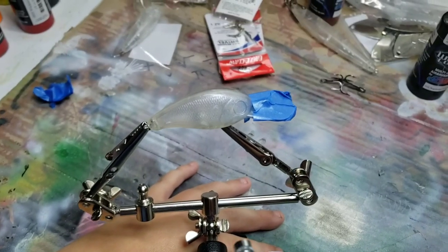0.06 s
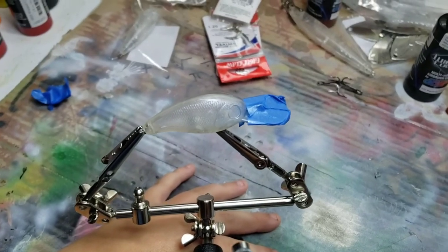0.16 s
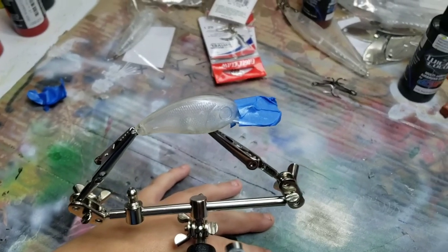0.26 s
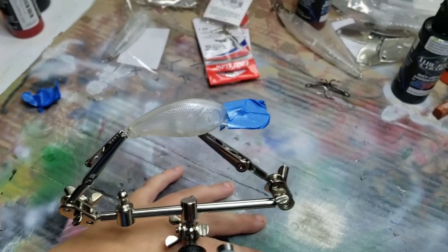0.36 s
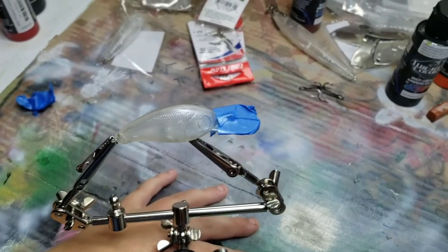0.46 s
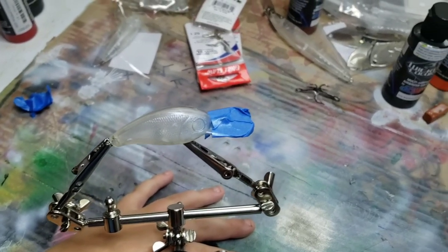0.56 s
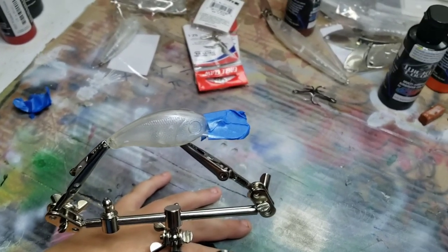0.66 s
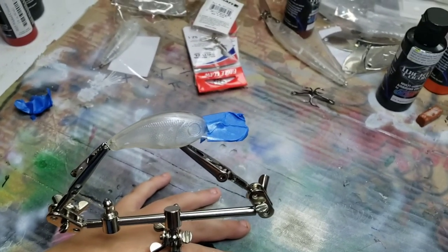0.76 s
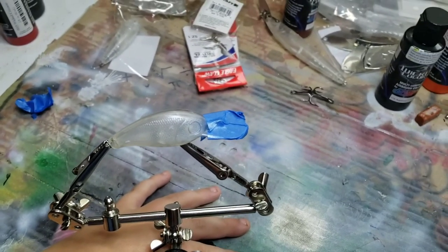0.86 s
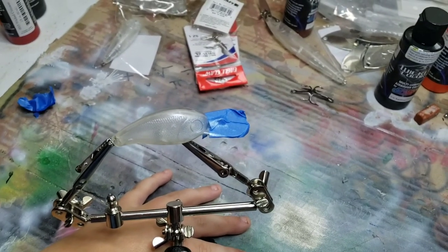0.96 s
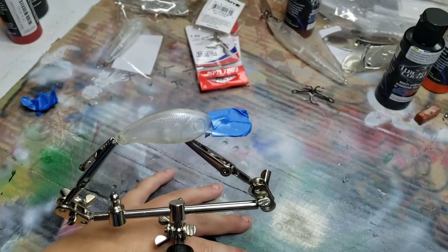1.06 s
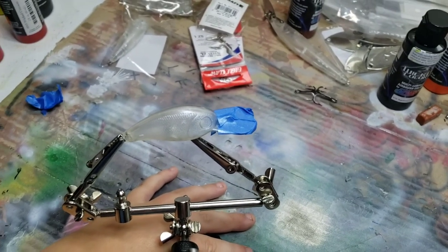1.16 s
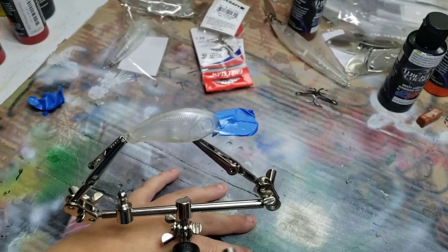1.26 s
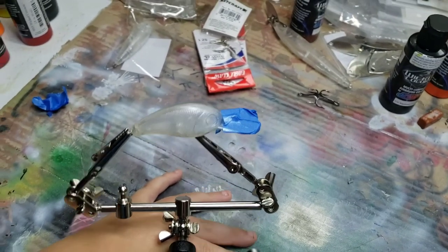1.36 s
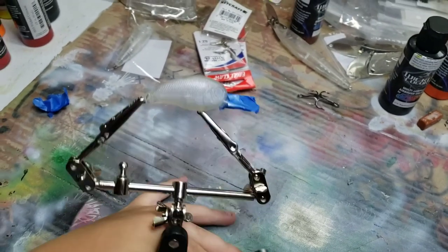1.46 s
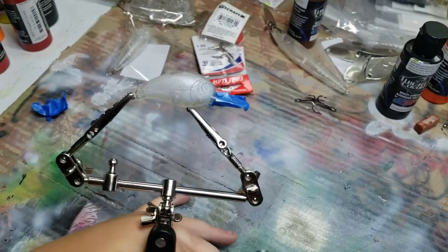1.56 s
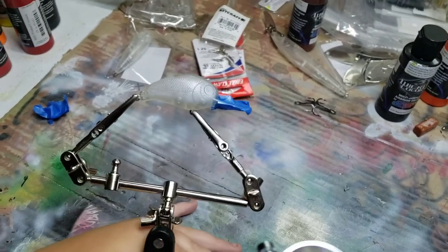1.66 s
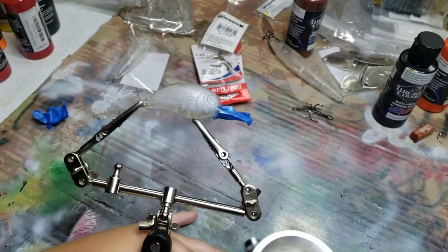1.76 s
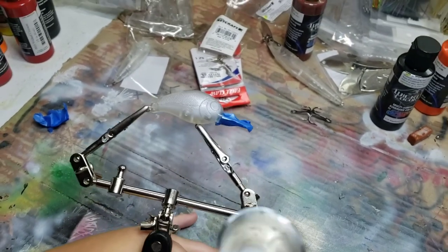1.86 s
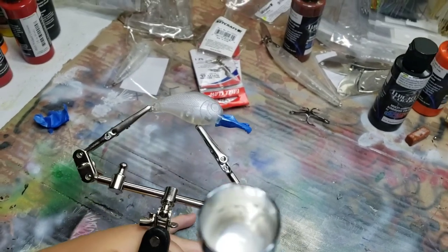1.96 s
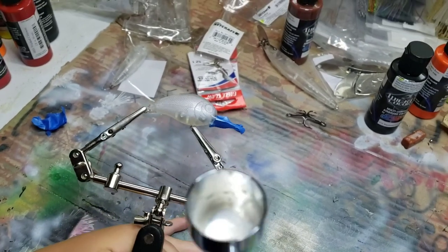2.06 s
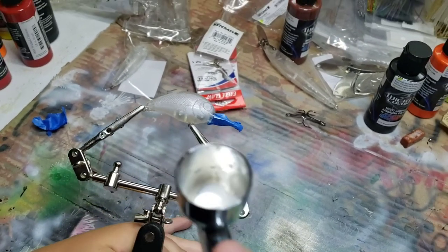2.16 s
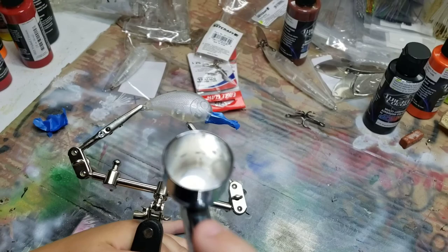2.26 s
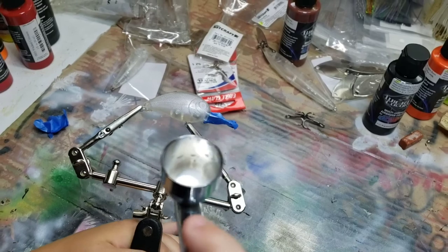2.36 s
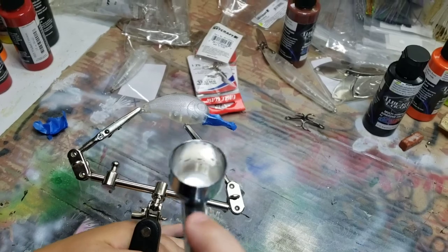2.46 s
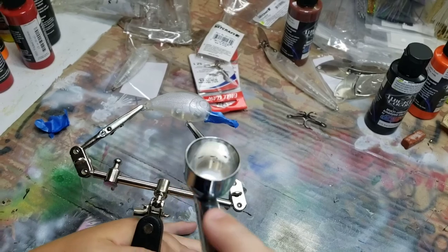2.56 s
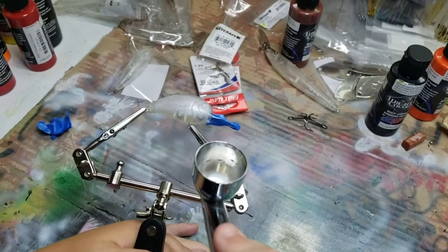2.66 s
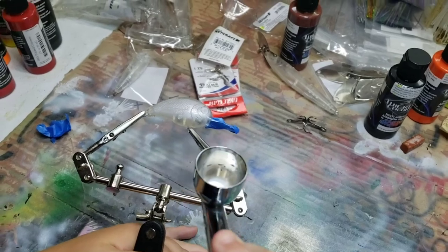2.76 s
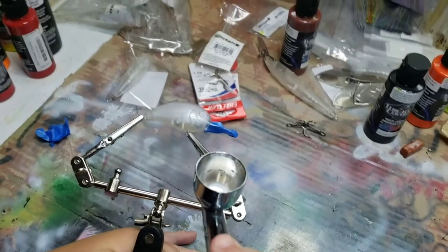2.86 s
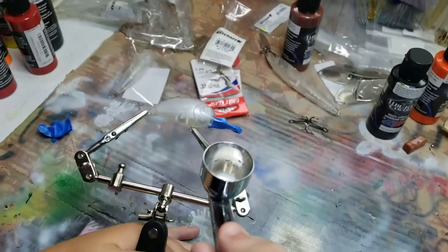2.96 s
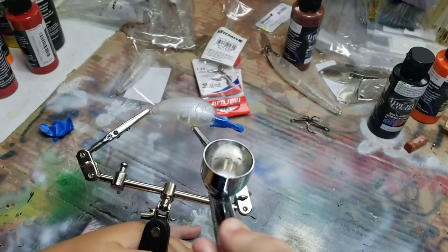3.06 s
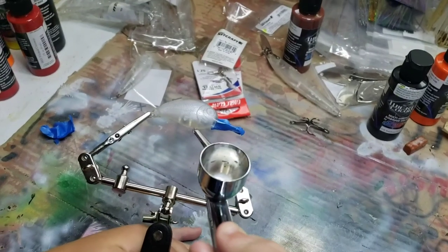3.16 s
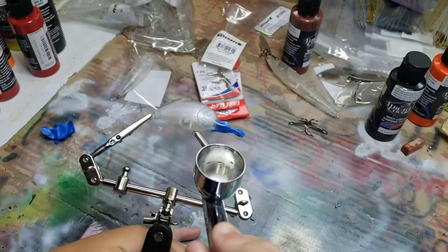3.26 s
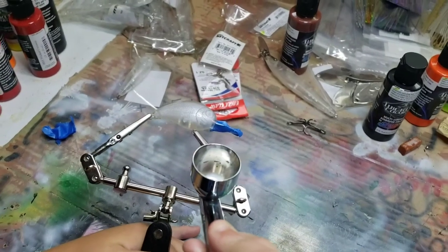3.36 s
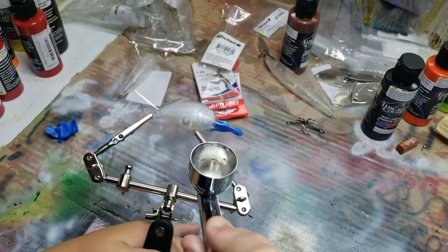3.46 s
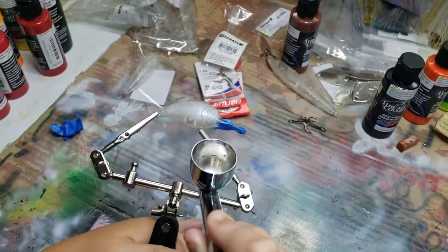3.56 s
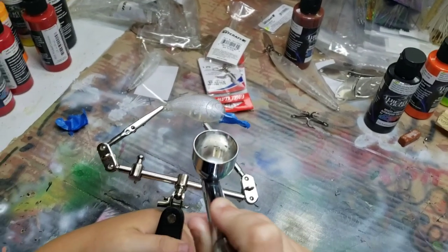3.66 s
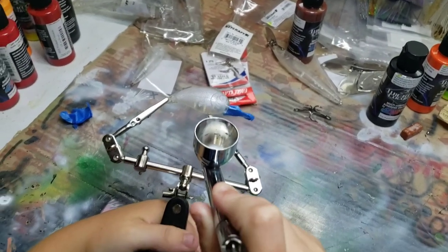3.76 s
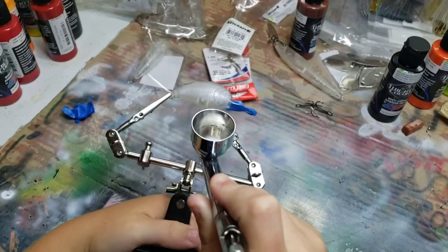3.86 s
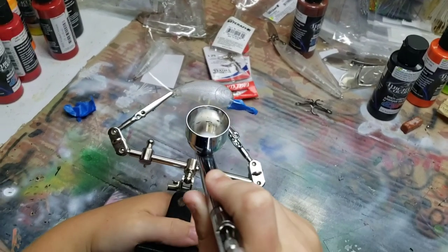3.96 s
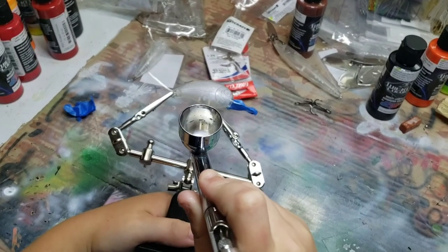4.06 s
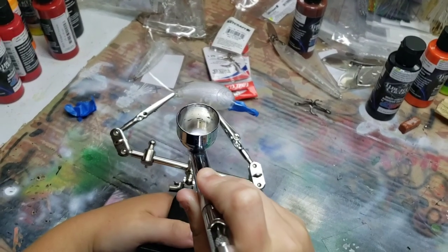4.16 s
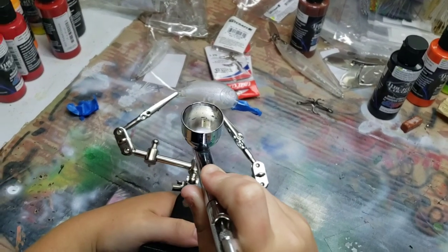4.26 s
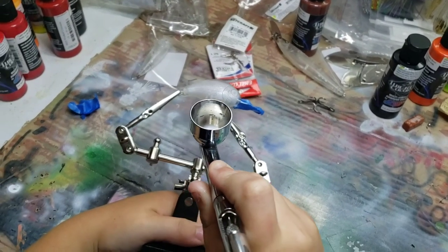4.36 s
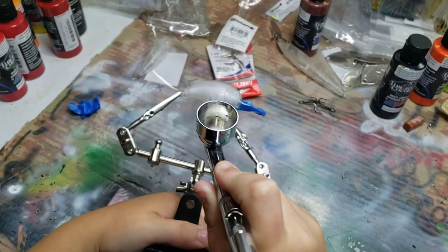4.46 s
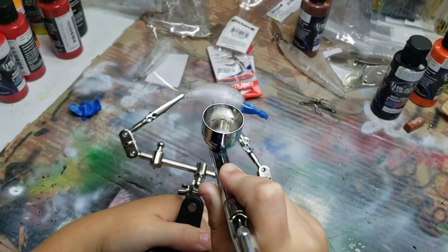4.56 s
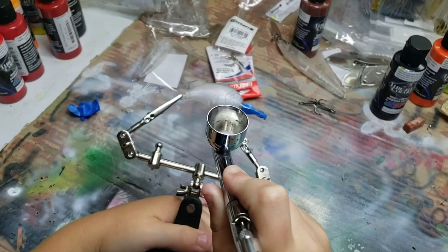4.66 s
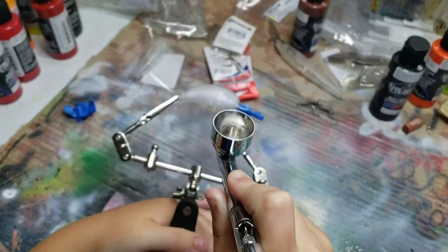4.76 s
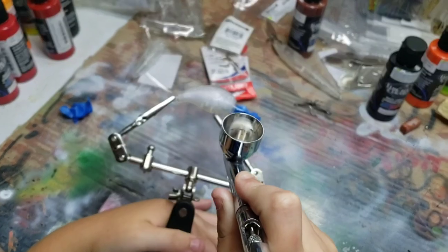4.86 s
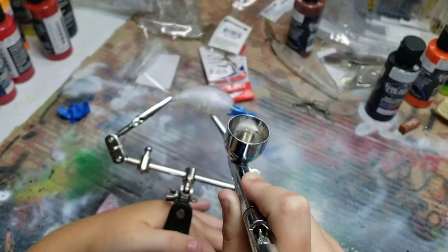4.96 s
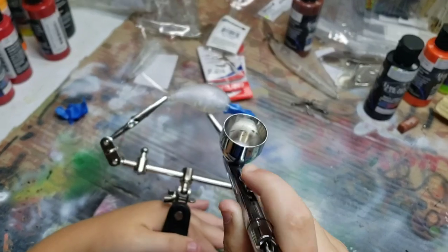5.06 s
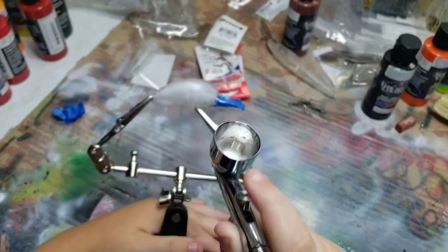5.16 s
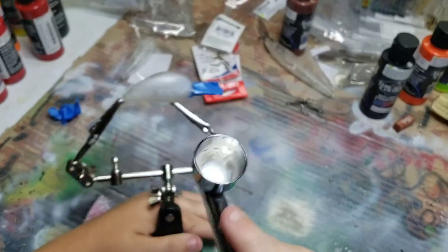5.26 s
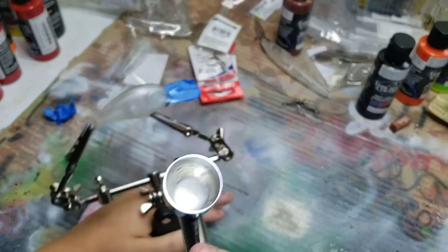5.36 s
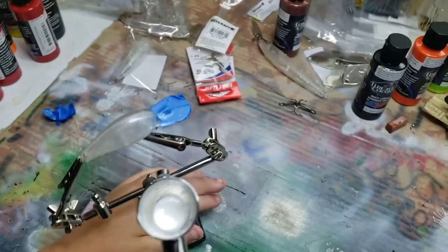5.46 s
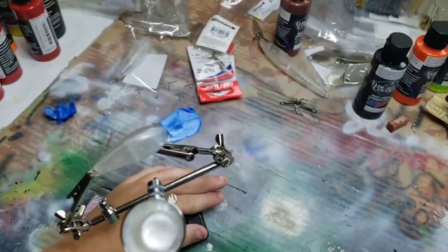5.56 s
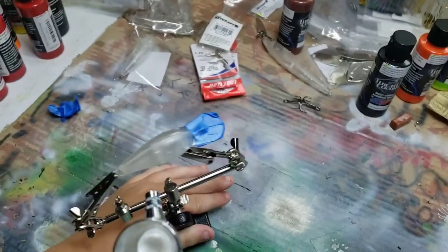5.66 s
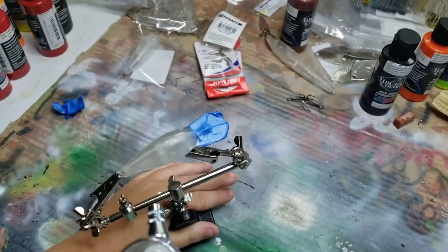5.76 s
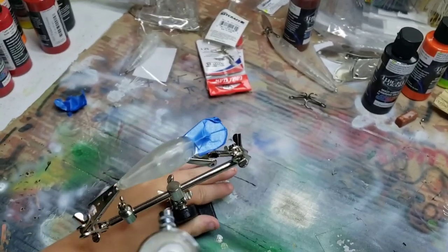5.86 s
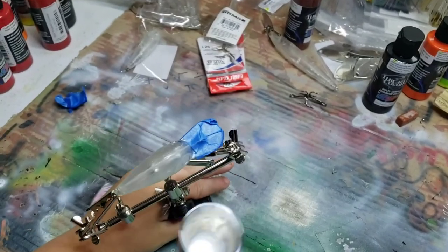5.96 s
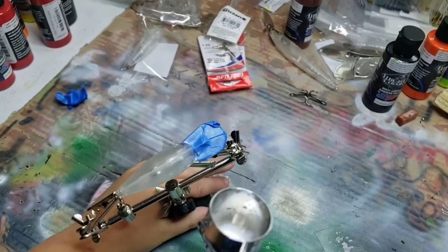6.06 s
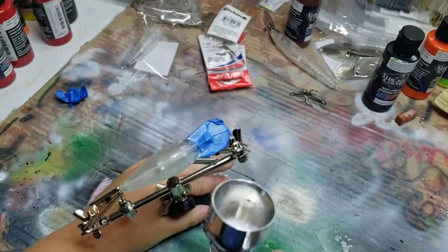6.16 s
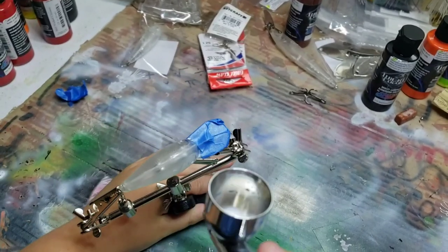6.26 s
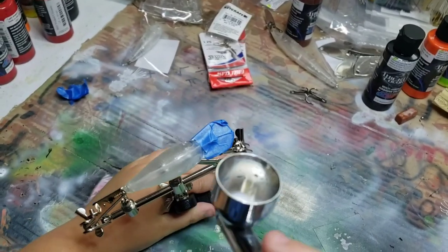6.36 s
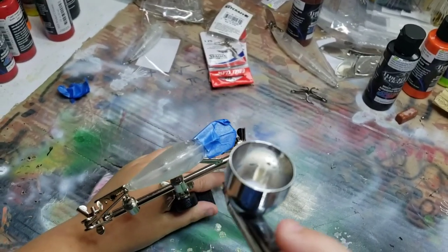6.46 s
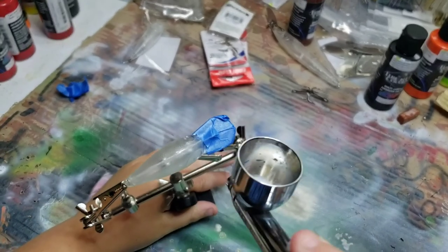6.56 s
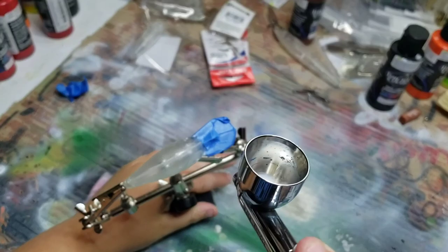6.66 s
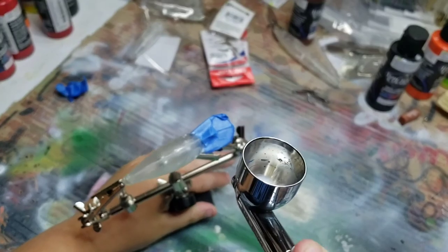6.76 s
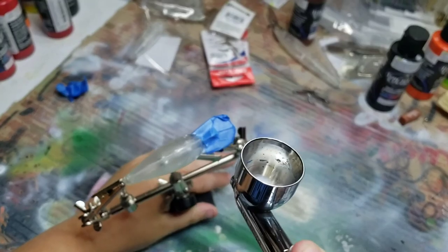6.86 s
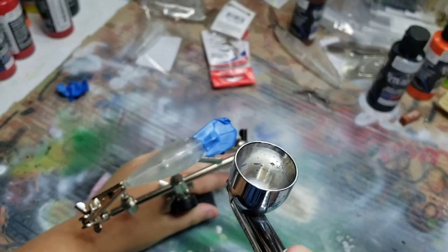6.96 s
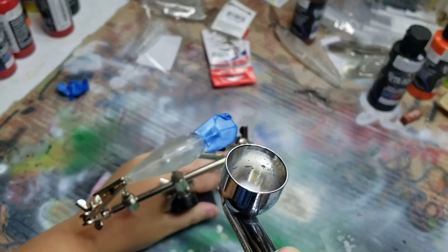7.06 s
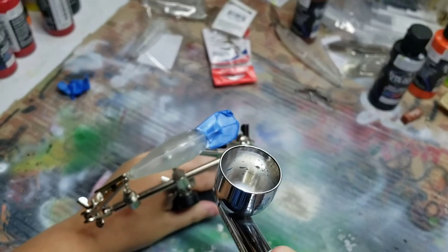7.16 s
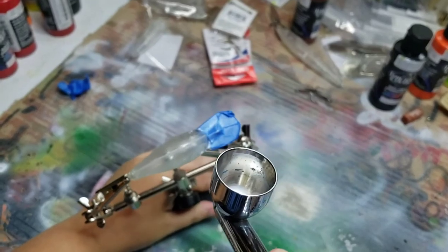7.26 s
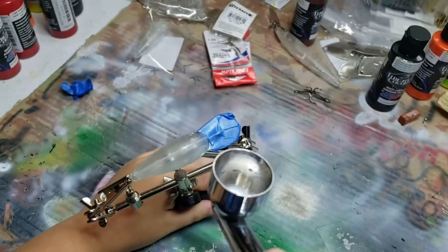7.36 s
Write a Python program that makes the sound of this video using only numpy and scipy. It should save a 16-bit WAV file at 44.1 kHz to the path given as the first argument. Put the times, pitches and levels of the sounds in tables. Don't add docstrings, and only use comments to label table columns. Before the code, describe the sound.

Close stereo sound of an airbrush in three bursts: bright, sizzling air with a softer roar where it strikes the work. Beneath it a small piston compressor chatters about twenty-eight knocks a second, wheezing. Each pause brings a crisp trigger snap, a sharp pressure-switch crack, slowing knocks, then faint ticks and sleeve rustle in a quiet room before the hiss resumes and the pump later joins.

```python
import sys
import numpy as np
from scipy import signal
from scipy.fft import rfft, irfft, next_fast_len
from scipy.io import wavfile
from scipy.ndimage import uniform_filter1d

SR = 44100
rng = np.random.default_rng(int(sys.argv[2]) if len(sys.argv) > 2 else 0)


def to_wav(s):
    ch = np.atleast_2d(s).T
    pcm = np.round(np.clip(ch, -1, 1) * 32767)
    wavfile.write(sys.argv[1], SR, pcm.astype(np.int16))


def amplitude_ratio(level_db):
    exponent = np.asarray(level_db, float) / 20
    return 10 ** exponent


N = 326340

# (opens [s], shuts [s])
TRIGGER = [
    (-1, 1.313),
    (2.406, 5.09),
    (6.424, 9),
]
# (time [s], air flow [dB], how squarely the jet beats on the work [dB])
BURSTS = [
    [(0, -34, -50), (.5, -34, -48), (.72, -32.5, -43), (.9, -34, -49), (1.25, -34, -50), (1.31, -36, -50)],
    [(2.42, -38, -62), (2.49, -41, -59), (2.68, -41, -56), (2.97, -35, -56), (4.0, -35, -52),
     (4.5, -34, -50), (5.08, -33, -50)],
    [(6.44, -37, -45), (6.57, -39, -47), (6.96, -33, -46), (7.17, -34, -43), (7.4, -34, -44)],
]
# (frequency [Hz], density [dB per Hz])
FIZZ = [(6500, -40), (10000, -11), (11400, -7), (12300, -1), (13300, -3.5), (14200, 0), (15100, 1),
        (15700, 3)]
# (frequency [Hz], density [dB per Hz])
HISS = [(1700, -40), (2700, -17), (3400, -15), (4160, -6), (4540, -5), (5360, -1.5), (7470, -3.5),
        (8070, -1), (8730, -5), (9300, -3), (12000, -32), (20000, -120)]
# (frequency [Hz], density [dB per Hz])
ROAR = [(88, -35), (150, -6), (226, -9), (401, -2), (717, -3), (944, -1), (1410, -10), (2030, -8),
        (2600, -12), (3600, -13), (5000, -40), (9000, -120)]
# (frequency [Hz], density [dB per Hz])
SPLASH = [(1200, -40), (2000, -4), (3000, 0), (4200, 0), (6500, -30), (12000, -120)]
HISS_DB = [-8.5, -8.5, -7]
SPLASH_DB = [-34, -32, -14.5]
# (frequency [Hz], left-right [dB])
JET_SIDE = [(60, 0.0), (99, 0.5), (160, 0.5), (270, 1.0), (450, 1.5), (740, 4.0), (1220, 1.0), (2010, 3.0),
            (3330, -5.5), (5500, -10.0), (9080, -8.0), (15000, -5.0)]
# (frequency [Hz], common share [0-1])
JET_ALIKE = [(100, .95), (640, .88), (1400, .6), (3000, .58), (8000, .58), (15000, .5)]
FIZZ_DB, ROAR_DB = 6.6, 0
OPEN_S, SHUT_S, BLEED_DB, BLEED_T60_S = .011, .012, -14, .5

# (first stroke at full speed [s], last stroke at full speed [s])
RUNS = [
    (-.07, 1.6805),
    (3.012, 5.5325),
    (7.031, 7.416),
]
# (time from full speed [s], level [dB])
SPIN_UP = [(-.14, -50), (-.075, -15), (-.02, -12), (0.0, -2), (.1, 0)]
# (time from cut-out [s], level [dB])
COAST = [(.009, 0), (.045, -7), (.1, -20), (.2, -30), (.34, -50)]
# (frequency [Hz], t60 [s], struck at share of turn [0-1], level in run 1, 2, 3 [dB])
CASING = [(76, .06, .22, -36, -37, -36.5), (119, .06, .36, -34, -34.5, -34.5),
          (170, .1, .46, -39.5, -39.5, -40), (245, .06, .4, -51, -51, -49), (463, .1, .05, -39, -40, -42),
          (505, .06, .4, -44.5, -44.5, -45), (598, .11, .15, -46, -42, -44), (700, .05, .6, -41, -46, -45),
          (795, .07, .1, -40, -45, -43), (880, .05, .0, -41, -49, -46), (962, .115, .5, -38, -36, -35.5),
          (1490, .04, .0, -50, -54, -50), (1580, .065, .0, -46, -35, -34),
          (1625, .085, .02, -36.5, -50, -48), (1765, .06, .0, -47, -47, -47),
          (2000, .03, .02, -39, -44, -43), (2200, .025, .06, -41, -46, -45),
          (5800, .025, .72, -49, -48, -48)]
# (frequency [Hz], density [dB per Hz])
WHEEZE = [(1410, -29), (2400, 1), (2480, -7), (3580, -12), (5880, -5), (7270, -10), (8510, -5), (9950, -12),
          (11000, -3), (15700, 0)]
# (frequency [Hz], density [dB per Hz])
RATTLE = [(24, -38), (45, -13), (162, -11), (401, -18), (453, -2), (677, -8), (978, -1), (1120, -20),
          (1340, -24), (1590, -4), (2600, -32), (3380, -62), (5720, -120)]
# (frequency [Hz], left-right [dB])
PUMP_SIDE = [(60, -0.5), (110, 0.0), (200, 1.0), (380, 2.5), (700, 3.0), (1290, 0.5), (2380, 2.5),
             (4400, -8.0), (8120, -12.0), (15000, -8.0)]
TURN_S = .035
SPIN_UP_DRAG, COAST_DRAG = 1.18, 1.36

# (frequency [Hz], density [dB per Hz])
HUM = [(20, -40), (35, -8), (55, 1), (80, 1), (100, -6), (145, -1), (200, -5), (310, -11), (500, -15),
       (1000, -20), (1600, -17), (2300, -23), (3200, -33), (5000, -100)]
# (frequency [Hz], density [dB per Hz])
SHUFFLE = [(1200, -40), (2200, -6), (3400, -10), (5000, -4), (7300, -10), (9500, -14), (15700, -7)]
# (frequency [Hz], common share [0-1])
HUM_ALIKE = [(60, .93), (180, .93), (550, .65), (1650, .2), (15000, .1)]
# (time [s], lift [dB], width [s])
STIRS = [(1.98, 6, .05), (2.2, 5, .08), (2.39, 11, .06), (6.15, 4, .02), (5.95, 5, .07), (6.24, 3, .06)]
HUM_DB, HUM_SURGE_DB, HUM_SINK_DB_PER_S, HUM_REST_DB = -56, -54, 20, -62
SHUFFLE_DB, SHUFFLE_SURGE_DB, SHUFFLE_SINK_DB_PER_S, SHUFFLE_REST_DB = -71, -62, 40, -82
SURGE_S, BACK_S = .05, .3

# (time [s], peak [dB], ring [Hz], left-right [dB])
RELEASES = [(1.3528, -20, 12400, -8.0), (5.1402, -17.5, 14900, -8.5)]
# (time [s], peak [dB], ring [Hz], left-right [dB])
CLICKS = [(1.5569, -35, 3610, -8.5), (1.7779, -34, 4050, -8.5), (1.9205, -43, 5620, -9.5),
          (2.0058, -36, 2870, -7.5), (5.6306, -36, 4110, -9.5)]
# (time [s], peak [dB], ring [Hz], left-right [dB])
TICKS = [(1.8617, -52, 5810, -8.5), (5.7164, -49, 5790, -12.0), (5.909, -60, 13000, -12.0),
         (6.1529, -52, 5050, -11.0), (6.155, -58, 7000, -11.0)]
# (time [s], peak [dB], ring [Hz], left-right [dB])
SWITCH = [(1.6846, -18, 8200, -14), (5.5368, -15.5, 8300, -15)]
# (time [s], peak [dB], ring [Hz], left-right [dB])
SWITCH_CRACK = [(1.685, -30, 5500, -8), (5.537, -30, 5500, -8), (2.868, -34, 2000, 0), (2.868, -38, 700, 1)]
# (time [s], peak [dB], ring [Hz], left-right [dB])
SWITCH_RING = [(1.686, -37, 8200, -12), (5.538, -35, 8300, -12)]
# (time [s], peak [dB], ring [Hz], left-right [dB])
KNOCKS = [(1.777, -39, 420, 1.5), (1.778, -41, 1100, 2), (1.823, -47, 800, 3.5), (1.931, -43, 850, 3.5),
          (2.119, -57, 1130, 2.5), (5.63, -38, 466, 2.0), (5.631, -40, 1100, 2), (5.803, -47, 900, 3.5),
          (6.031, -54, 264, 3.5), (6.69, -44, 170, 1)]
# (time [s], peak [dB], ring [Hz], left-right [dB])
PUFF = [(2.0961, -38, 5200, -6.5)]
# (time [s], peak [dB], ring [Hz], left-right [dB])
PUFF_RING = [(2.097, -49, 3700, -6.5), (2.097, -45, 5700, -6.5), (2.097, -48, 7100, -6.5)]
# (time [s], peak [dB], ring [Hz], left-right [dB])
BUMP = [(2.335, -51, 380, 2), (6.23, -54, 150, 1), (5.54, -42, 60, -2)]
# (events, t60 [s], ringing share [0-1])
KINDS = [(CLICKS, .035, .25), (RELEASES, .018, .35), (TICKS, .04, .9), (SWITCH, .009, .93),
         (SWITCH_CRACK, .025, .25), (SWITCH_RING, .22, 1), (KNOCKS, .045, .75),
         (PUFF, .3, .05), (PUFF_RING, .36, .9), (BUMP, .3, .4)]
# (time [s], level [dB], frequency [Hz], t60 [s])
TANK = [(1.823, -45, 760, .14), (1.932, -50, 762, .13), (5.677, -50, 757, .3), (5.803, -54, 761, .3)]
# (time [s], level [dB], frequency [Hz], t60 [s])
THUMP = (2.868, -35, 62, .16)
# (time [s], level [dB], frequency [Hz], t60 [s])
SPRING = (5.141, -50, 8678, .17)
# (frequency [Hz], t60 [s], left-right likeness [0-1])
ROOM = [(100, .3, .97), (700, .25, .8), (2000, .22, .2), (8000, .2, .05), (16000, .1, .05)]


def unit(x):
    return x / np.sqrt(np.mean(x ** 2) + 1e-20)


def along(points, hz):
    f, v = np.transpose(points)
    return np.interp(np.log(hz + 1), np.log(f + 1), v)


def curves(rows):
    s, *cols = np.transpose(rows)
    return [np.interp(np.arange(N) / SR, s, c) for c in cols]


def wobble(rate):
    knots = rng.standard_normal(int(N * rate / SR) + 2)
    return np.interp(np.arange(N) * rate / SR, np.arange(len(knots)), knots)


def filtered(x, response):
    m = next_fast_len(x.shape[-1] + 4096, True)
    spectrum = rfft(x, m) * response(np.fft.rfftfreq(m, 1 / SR))
    return irfft(spectrum, m)[..., :x.shape[-1]]


def leaned(x, balance):
    def response(hz):
        db = along(balance, hz)
        return amplitude_ratio(db * [[.5], [-.5]]) * np.sqrt(2 / (1 + np.cosh(db * np.log(10) / 20)))
    return filtered(x, response)


def drift(shape):
    coarse = rng.standard_normal((shape[0] // 4 + 1, shape[1]))
    smooth = uniform_filter1d(coarse, size=3, axis=0)
    smooth = uniform_filter1d(smooth, size=16, axis=1)
    return np.repeat(unit(smooth), repeats=4, axis=0)[:shape[0]]


def rush(spectrum, alike, balance, patchy_db):
    hz = np.fft.rfftfreq(2048, 1 / SR)[:, None]
    shape = (len(hz), N // 1024 + 2)
    a, b = rng.standard_normal((2, *shape)) + 1j * rng.standard_normal((2, *shape))
    common = np.clip(along(alike, hz), 0, 1)
    turn = np.exp(1j * (1.5 * drift(shape) * hz / (hz + 2500) - 2 * np.pi * hz * 4 / SR))
    lean = amplitude_ratio(along(balance, hz) / 2)
    left = a * lean * amplitude_ratio(patchy_db * drift(shape))
    right = (common * a * turn + np.sqrt(1 - common ** 2) * b) / lean * amplitude_ratio(patchy_db * drift(shape))
    colour = amplitude_ratio(along(spectrum, hz)) / np.hypot(lean, 1 / lean)
    frames = irfft(colour * [left, right], axis=1).transpose(0, 2, 1)
    frames = frames * np.sin(np.pi * np.arange(2048) / 2048)
    overlapped = frames[:, 1:, :1024] + frames[:, :-1, 1024:]
    pair = overlapped.reshape(2, -1)[:, :N]
    return pair / np.std(pair.mean(0))


def ring(hz, t60, rise):
    t = np.arange(SR // 4) / SR
    return np.sin(2 * np.pi * hz * t) * amplitude_ratio(-60 * t / t60) * (1 - np.exp(-t / rise))


def valve(opens, shuts):
    t = np.arange(N) / SR
    opening = np.clip((t - opens) / OPEN_S, 0, 1)
    shutting = np.clip((shuts - t) / SHUT_S, 0, 1)
    bleed = amplitude_ratio(BLEED_DB - 60 * np.maximum(t - shuts, 0) / BLEED_T60_S)
    return opening * np.maximum(shutting, bleed)


def jet():
    flow_db, beating_db = curves(np.vstack(BURSTS))
    valves = [valve(opens, shuts) for opens, shuts in TRIGGER]
    flow_db = flow_db + .4 * wobble(9) + .3 * wobble(40)
    fizz = amplitude_ratio(flow_db + FIZZ_DB) * rush(FIZZ, JET_ALIKE, JET_SIDE, patchy_db=2.0)
    hiss = amplitude_ratio(flow_db + .8) * rush(HISS, JET_ALIKE, JET_SIDE, patchy_db=1.6)
    roar_db = beating_db + ROAR_DB + 1.2 * wobble(12)
    roar = amplitude_ratio(roar_db) * rush(ROAR, JET_ALIKE, JET_SIDE, patchy_db=1.2)
    splash = amplitude_ratio(flow_db) * rush(SPLASH, JET_ALIKE, JET_SIDE, patchy_db=1.6)
    air = (fizz + roar) * sum(valves)
    return air + hiss * (amplitude_ratio(HISS_DB) @ valves) + splash * (amplitude_ratio(SPLASH_DB) @ valves)


def strokes(first, last):
    step = np.arange(1, 5)
    steady = np.linspace(first, last, round((last - first) / TURN_S) + 1)
    before = first - np.cumsum(TURN_S * SPIN_UP_DRAG ** step)[::-1]
    after = last + np.cumsum(TURN_S * COAST_DRAG ** step)
    return np.r_[before, steady, after]


def piston_knocks(effort):
    body = np.zeros((2, N))
    lead = 512
    for run, (first, last) in enumerate(RUNS):
        at = np.round(strokes(first, last) * SR).astype(int)
        size = amplitude_ratio(.8 * rng.standard_normal(len(at))) * effort[np.clip(at, 0, N - 1)]
        stroke = np.zeros(SR // 4)
        for hz, t60, share, *run_db in CASING:
            mode = amplitude_ratio(run_db[run]) * ring(hz, t60, rise=1.2 / hz)
            stroke += np.roll(mode, round(share * TURN_S * SR))
        pair = np.pad([stroke, np.roll(stroke, 4)], ((0, 0), (lead, 0)))
        blows = np.bincount(at + SR, size, N + SR)
        knocks = signal.oaconvolve(blows[None], leaned(pair, PUMP_SIDE), axes=1)
        body += knocks[:, SR + lead:SR + N + lead]
    return body


def intake_and_rattle(effort):
    every = np.concatenate([strokes(*run) for run in RUNS])
    angle = np.interp(np.arange(N) / SR, every, np.arange(len(every)))
    gasp = .42 + .58 * np.exp(3 * (np.cos(2 * np.pi * (angle - .12)) - 1))
    wheeze = amplitude_ratio(-49) * gasp * rush(WHEEZE, HUM_ALIKE, PUMP_SIDE, patchy_db=.8)
    rattle = amplitude_ratio(-49) * rush(RATTLE, JET_ALIKE, PUMP_SIDE, patchy_db=.8)
    return effort * (wheeze + rattle)


def compressor():
    rows = []
    for first, last in RUNS:
        rows += [(first + s, db) for s, db in SPIN_UP]
        rows += [(last + s, db) for s, db in COAST]
    effort = amplitude_ratio(curves(rows)[0])
    return piston_knocks(effort) + intake_and_rattle(effort)


def settling(busy_db, surge_db, sink_db_per_s, rest_db):
    rows = []
    for (_, cut), (opens, _) in zip(RUNS, TRIGGER[1:]):
        peak = cut + SURGE_S
        rested = peak + (surge_db - rest_db) / sink_db_per_s
        rows += [(cut - .08, busy_db), (peak, surge_db), (rested, rest_db)]
        rows += [(opens, rest_db), (opens + BACK_S, busy_db)]
    return curves(rows)[0]


def background():
    t = np.arange(N) / SR
    stir_db = sum(db * np.exp(-((t - s) / width) ** 2) for s, db, width in STIRS)
    hum_db = settling(HUM_DB, HUM_SURGE_DB, HUM_SINK_DB_PER_S, HUM_REST_DB)
    hum_db = hum_db + .4 * stir_db + 1.5 * wobble(14)
    shuffle_db = settling(SHUFFLE_DB, SHUFFLE_SURGE_DB, SHUFFLE_SINK_DB_PER_S, SHUFFLE_REST_DB)
    shuffle_db = shuffle_db + stir_db + 1.5 * wobble(25)
    hum = amplitude_ratio(hum_db) * rush(HUM, HUM_ALIKE, PUMP_SIDE, patchy_db=1.5)
    shuffle = amplitude_ratio(shuffle_db) * rush(SHUFFLE, HUM_ALIKE, PUMP_SIDE, patchy_db=1.5)
    return hum + shuffle


def crack(hz, t60, share):
    t = np.arange(SR // 5) / SR
    own = rng.standard_normal((3, len(t)))
    noise = own[0] + .7 * own[1:]
    peak = signal.iirpeak(min(hz, 16000), 6, SR)
    rung = signal.lfilter(*peak, signal.lfilter(*peak, noise))
    band = signal.butter(2, [min(hz, 6000) / 3, min(hz * 3, 20000)], "band", fs=SR)
    broad = signal.lfilter(*band, noise)
    mixed = share * unit(rung) + (1 - share) * unit(broad)
    mixed = mixed * amplitude_ratio(-60 * t / t60) * (1 - np.exp(-t / .0006))
    return mixed / np.abs(mixed.mean(0)).max()


def contacts():
    out = np.zeros((2, N + SR))
    for rows, t60, share in KINDS:
        for s, db, hz, pan_db in rows:
            gain = amplitude_ratio(db - 2.5 + pan_db * np.array([[.5], [-.5]]))
            out[:, round(s * SR):][:, :SR // 5] += gain * crack(hz, t60, share)
    for s, db, hz, t60 in (THUMP, SPRING, *TANK):
        out[:, round(s * SR):][:, :SR // 4] += amplitude_ratio(db) * ring(hz, t60, rise=.002)
    return out[:, :N]


def room(x):
    hz, t, (a, b) = signal.stft(rng.standard_normal((2, SR // 4)), SR, nperseg=256)
    f, t60, alike = np.transpose(ROOM)
    common = np.clip(np.interp(hz, f, alike), 0, 1)[:, None]
    fade = amplitude_ratio(-60 * t / np.interp(hz, f, t60)[:, None])
    pair = fade * [a, common * a + np.sqrt(1 - common ** 2) * b]
    tail = signal.istft(pair, SR, nperseg=256)[1]
    tail = np.pad(tail / np.linalg.norm(tail[0]), ((0, 0), (100, 0)))
    return signal.oaconvolve(x, tail, axes=1)[:, :N]


def scene():
    air, pump, background_noise, clicks = jet(), compressor(), background(), contacts()
    tail = room(amplitude_ratio(-18) * air + amplitude_ratio(-13) * pump + amplitude_ratio(-13) * clicks)
    return air + pump + clicks + background_noise + tail


def top_cut(x):
    return signal.sosfilt(signal.butter(12, 17070, fs=SR, output="sos"), x)


def record(dry):
    def band(hz):
        top = np.clip((15750 + 30 - hz) / 60, .001, 1)
        return top / np.sqrt(1 + (38 / (hz + 1)) ** 6)
    mix = filtered(dry, band)
    return top_cut(mix)


dry = scene()
out = record(dry)
to_wav(out)
```